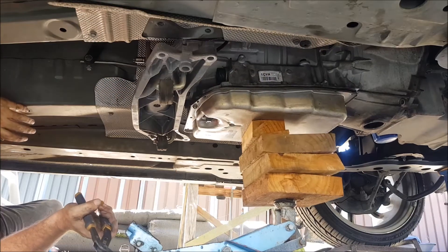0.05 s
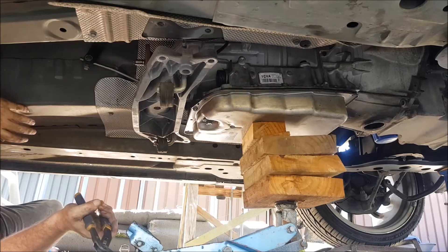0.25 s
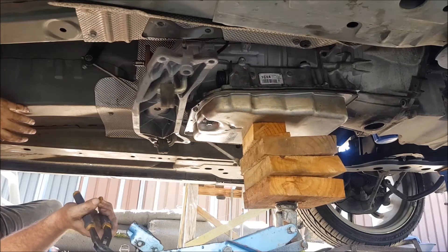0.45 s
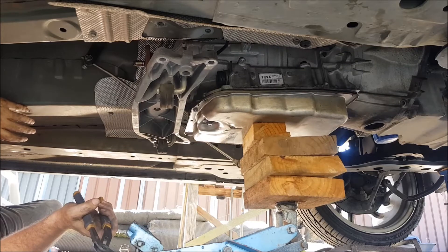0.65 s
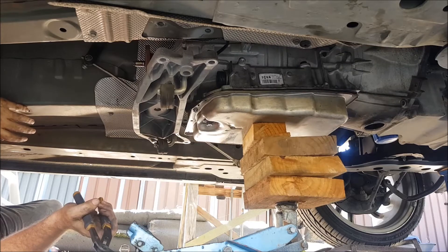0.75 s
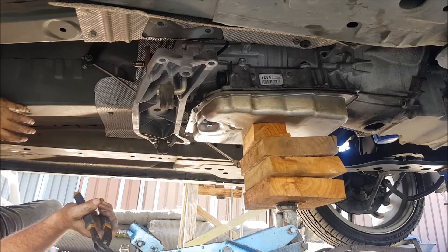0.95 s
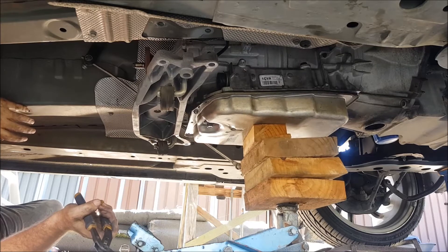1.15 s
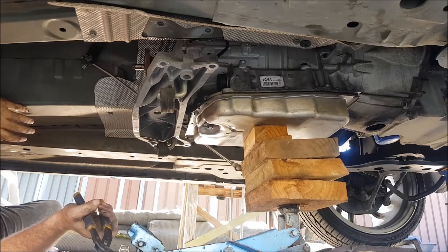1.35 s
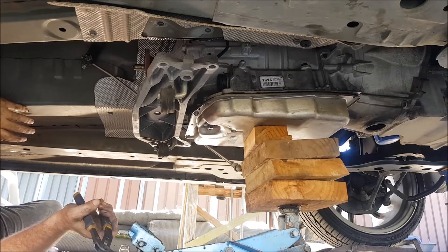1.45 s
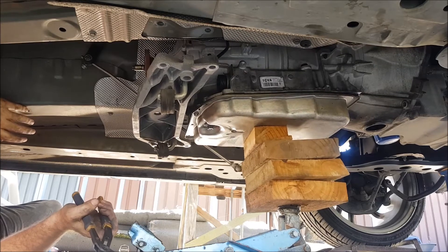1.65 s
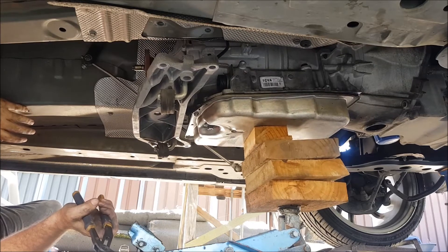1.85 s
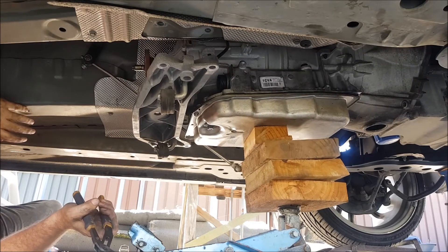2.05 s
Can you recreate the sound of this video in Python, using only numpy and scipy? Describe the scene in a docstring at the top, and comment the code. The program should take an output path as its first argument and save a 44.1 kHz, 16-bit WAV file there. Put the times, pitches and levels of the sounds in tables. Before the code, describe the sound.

A heavy gearbox drops on a trolley jack in jolting metallic clanks, with creaks and small clicks.

```python
"""In a garage, under a car: a heavy gearbox sinks on a trolley jack.
Behind it lie a low rumble and faint grainy sliding, both shaped noise.
Creaks, heard before and between the first three jolts, are uneven slips shaking a set of modes, with scraping noise.
Small parts click, noise ticks with dull knocks, mostly as the load settles after the jolts.
Five jolts each give a noise crack, a sine thump and an underbody boom; the last three ring out like steel."""
import sys
import numpy as np
from scipy import signal
from scipy.fft import irfft
from scipy.io import wavfile
from scipy.ndimage import uniform_filter1d

SR = 44100
rng = np.random.default_rng(int(sys.argv[2]) if len(sys.argv) > 2 else 0)


def inscribe(sig):
    """Save sig as 16-bit PCM at rate SR to the path in sys.argv[1].

    A 1-D sig is mono; a 2-D sig holds one channel per row.
    Samples are clipped to [-1, 1] before scaling.
    """
    pcm = np.round(np.clip(np.atleast_2d(sig).T, -1, 1) * 32767)
    wavfile.write(sys.argv[1], SR, pcm.astype(np.int16))


N = 92610  # length of the scene in samples
T = np.arange(int(.8 * SR)) / SR  # time axis of one event, s
EDGE_HZ = 15900  # upper band limit
SMALL_LEFT_DB = -24  # treble shading on the left for clicks and sliding, scaled by SHADOW

# Spectrum of surfaces scraping: (frequency [Hz], relative level per Hz [dB])
SCRAPE_SPECTRUM = [(300, -5.5), (1000, 6.5), (1700, -1), (4200, -2), (6500, -12), (9000, -15.5),
                   (12500, -8.5), (16000, -12.5)]
# Treble shading of the left ear: (frequency [Hz], share of its treble loss [ratio])
SHADOW_SHARE = [(250, 0), (600, .1), (1300, .42), (3000, .7), (6000, 1.15), (9000, 1.35), (12000, .85),
                (14500, .6)]


def amp(db):
    """Decibels to gain."""
    return 10 ** (np.asarray(db) / 20)


def evened(x):
    """Scales the louder channel to rms 1."""
    return x / np.sqrt(np.max(np.mean(x ** 2, -1)) + 1e-20)


def read(points, hz):
    """Reads a table on a log-frequency axis."""
    f, value = np.transpose(points)
    return np.interp(np.log(hz + 1), np.log(f + 1), value)


def add(mix, s, sound):
    """Mixes a stereo sound in at time s."""
    part = mix[:, max(round(s * SR), 0):][:, :sound.shape[1]]
    part += sound[:, :part.shape[1]]


def decay(t, t60):
    """Exponential decay by 60 dB in t60 seconds."""
    return np.exp(-np.log(1000) * t / t60)


def envelope(rise, hold, t60):
    """Linear attack, hold and exponential release, in seconds."""
    return np.minimum(T / rise, 1) * decay(np.maximum(T - rise - hold, 0), t60)


def noise(spectrum, left_db, tilt_db=0, colour=lambda hz: 0, size=len(T)):
    """Stereo noise of a given spectrum, tilt per octave and colour in dB, its treble shaded on the left."""
    # Likeness of the two ears: (frequency [Hz], left-right likeness [0-1])
    likeness = [(30, 0.64), (90, 1), (180, 0.82), (350, 0.73), (700, 0.61), (1500, .4), (3000, 0.68),
                (16000, 0.15)]
    hz = np.fft.rfftfreq(size, 1 / SR) + 1
    right, other = rng.standard_normal((2, len(hz))) + 1j * rng.standard_normal((2, len(hz)))
    same = np.clip(read(likeness, hz), 0, 1)
    left = same * right + np.sqrt(1 - same ** 2) * other
    left = left * amp(left_db * read(SHADOW_SHARE, hz))
    db = read(spectrum, hz) + tilt_db * np.log2(hz) + colour(hz)
    return evened(irfft(np.array([left, right]) * amp(db) * (hz < EDGE_HZ), size))


def garage(x):
    """Turns steady noise into a room tail whose decay time varies with frequency."""
    # Reverberation of the garage: (frequency [Hz], t60 [s])
    room = [(100, .4), (1000, 0.29), (2800, 0.29), (4500, 0.19), (6500, 0.13), (12000, .26), (16000, .2)]
    hz, t, bands = signal.stft(x, SR, nperseg=256)
    bands = bands * decay(t, read(room, hz)[:, None])
    return signal.istft(bands, SR)[1][:, :len(T)] * np.minimum(T / .008, 1)


def ring(modes, left_db, tilt_db=0, rough=0):
    """Decaying modes; reflections make them flutter if rough, and reach the two ears out of step."""
    flutter_hz = 70
    out, knots = np.zeros((2, len(T))), np.arange(128) / flutter_hz
    for hz, db, t60 in modes:
        shade = read(SHADOW_SHARE, hz)
        turn, skew = rng.uniform(-np.pi, np.pi, 2)
        sway = rng.standard_normal((2, len(knots))) + 1j * rng.standard_normal((2, len(knots)))
        t = T[T < 1.5 * t60]
        swaying = np.array([np.interp(t, knots, s) for s in sway])
        flutter = (1 + rough * swaying) / np.hypot(1, rough)
        ears = np.array([[amp(left_db * shade) * np.exp(1j * skew * shade)], [1]])
        wave = np.exp(1j * (2 * np.pi * hz * t + turn)) * decay(t, t60)
        gain = amp(db + tilt_db * np.log2(hz / modes[0][0]))
        out[:, :len(t)] += (ears * flutter * wave).real * gain
    return out


def rumble():
    """Low rumble of the garage: shaped noise whose level drifts."""
    # Spectrum of the rumble: (frequency [Hz], relative level per Hz [dB])
    floor = [(15, -29.5), (28, -18.5), (45, -5), (100, -2), (160, -6.5), (250, -10), (400, -14), (650, -21),
             (1040, -26.5), (1560, -39), (4500, -49), (16000, -54)]
    # Drift of the rumble: (time [s], level [dB])
    floor_db = [(0, -46.5), (.18, -47.5), (.75, -53), (1.35, -54.5), (1.65, -51), (1.85, -50), (2.1, -50.5)]
    t = np.arange(N) / SR
    return noise(floor, -1.5, size=N) * amp(np.interp(t, *np.transpose(floor_db)))


def sliding():
    """Faint grainy sliding under the load: scraping noise with a randomly wavering level."""
    # Course of the sliding, before its grain: (time [s], level [dB])
    rub_db = [(0, -73), (.07, -52.5), (.2, -72.5), (.7, -77.5), (.95, -73.5), (1.3, -67), (1.68, -62),
              (1.9, -75), (2.1, -69.5)]
    t = np.arange(N) / SR
    grain = evened(uniform_filter1d(rng.standard_normal(N), size=400))  # smoothed over 9 ms
    db = np.interp(t, *np.transpose(rub_db)) + 2.2 * grain
    return noise(SCRAPE_SPECTRUM, SMALL_LEFT_DB, size=N) * amp(db)


def click(db, bright_hz, boost_db, tilt_db, top_hz, knock_db):
    """A small part slips: a bright tick, a dull knock and the room's answer."""
    # Spectrum of a tick, before tilt and colour: (frequency [Hz], relative level per Hz [dB])
    tick_spectrum = [(300, -19.5), (1700, -5), (3000, 0.5), (5000, 2.5), (6500, -6.5), (8200, -10.5),
                     (11000, -9.5), (13000, -10.5), (16000, -15)]
    # Spectrum of the dull knock: (frequency [Hz], relative level per Hz [dB])
    knock_spectrum = [(100, -35), (400, -12), (580, 7), (900, -2), (1600, -11), (5000, -28)]
    boost_octaves, room_db = 0.29, -12.5
    snap_gain, snap_s = 0.37, 0.00084  # the direct sound stands out from its first reflections

    def colour(hz):
        """One broad resonance and a steep top edge, in dB."""
        resonance = boost_db * np.exp(-.5 * (np.log2(hz / bright_hz) / boost_octaves) ** 2)
        return resonance - 10 * np.log10(1 + (hz / top_hz) ** 10)

    tick = noise(tick_spectrum, SMALL_LEFT_DB, tilt_db, colour)
    tick *= envelope(rise=0.00033, hold=0.00069, t60=0.071)
    tick *= 1.07 + snap_gain * np.exp(-(T / snap_s) ** 2)
    tail = amp(room_db) * garage(noise(tick_spectrum, SMALL_LEFT_DB, tilt_db, colour))
    knock = noise(knock_spectrum, SMALL_LEFT_DB) * envelope(rise=0.0078, hold=0, t60=0.097)
    return amp(db) * (tick + tail) + amp(knock_db) * knock


def creak(length, groan_db, rate, tilt_db, scrape_db):
    """Stick-slip: uneven slips shake the support's modes while the surfaces scrape."""
    # Modes of the creaking support, before tilt: (frequency [Hz], relative level [dB], t60 [s])
    support = [(342.1, -6, 0.11), (392, -2.5, .12), (500.3, -3, 0.13), (654, -4.5, .11), (850, -10, .08),
               (988, 3, 0.027), (1109, -8, 0.099), (1120, 1, 0.034), (1548, -15.5, 0.11)]
    left_db, slip_jitter, slip_spread_db = -13, .3, 4
    gaps, sizes = rng.standard_normal((2, 40))
    at = np.cumsum(np.exp(slip_jitter * gaps)) / rate
    at = at - at[0]
    during = at < length
    slips = np.zeros(len(T))
    slips[(at[during] * SR).astype(int)] = amp(slip_spread_db * sizes[during])
    modes = ring(support, left_db, tilt_db)
    groan = signal.fftconvolve(slips[None], modes, axes=1)[:, :len(T)]
    dull = signal.butter(2, 2200, fs=SR, output="sos")
    groan = evened(signal.sosfilt(dull, groan)) * np.sqrt(length / T[-1])
    scrape = noise(SCRAPE_SPECTRUM, left_db) * envelope(length / 2, length * 0.4, t60=0.14)
    return amp(groan_db) * groan + amp(scrape_db) * scrape


def contact_crack(left_db, tilt_db):
    """Metal cracks against metal: a short noise burst with a snap at its start and a room tail."""
    # Spectrum of the crack, before tilt: (frequency [Hz], relative level per Hz [dB])
    crack_spectrum = [(200, -6), (700, -6), (1150, -0.5), (1750, -5), (2200, -1.5), (2500, -4.5),
                      (3000, -1.5), (3450, 6), (3900, -2), (4300, 7.5), (5200, -4), (5800, -6.5),
                      (7600, -8.5), (8300, -10), (10500, -8), (11500, -10.5), (13000, -6), (16000, -8)]
    snap_gain, snap_s, room_db = 0.23, 0.0019, -15.5
    crack = noise(crack_spectrum, left_db, tilt_db)
    crack *= envelope(rise=0.0011, hold=0.0048, t60=0.066)
    crack *= 1 + snap_gain * np.exp(-(T / snap_s) ** 2)
    return crack + amp(room_db) * garage(noise(crack_spectrum, left_db, tilt_db))


def casing_thump(start_hz):
    """The mass lands just after the contact: a brief sine that swells, fades and sags slightly."""
    delay_s, rise_s, fade_s, sag_per_s, fade_shape = .0052, .0095, .0195, .5, 2.1
    t = np.maximum(T - delay_s, 0)
    swell = np.sin(np.pi / 2 * np.minimum(t / rise_s, 1)) ** 2
    fade = np.exp(-(np.maximum(t - rise_s, 0) / fade_s) ** fade_shape)
    hz = start_hz * np.exp(-sag_per_s * t)
    return swell * fade * np.sin(2 * np.pi * np.cumsum(hz) / SR)


def underbody_boom(left_db):
    """Casing and underbody boom on: low noise and decaying modes, faded together."""
    # Spectrum of the boom: (frequency [Hz], relative level per Hz [dB])
    boom_spectrum = [(25, -29.5), (60, -7), (115, -18), (180, 6.5), (300, -1.5), (500, -5), (800, -16),
                     (1100, -21), (1500, -20.5), (3000, -30), (8000, -64)]
    # Casing and underbody modes: (frequency [Hz], relative level [dB], t60 before the fade [s])
    case_modes = [(180.2, 7, .33), (217.7, -2, .3), (260.8, -7, 0.45), (277.6, -2.5, 0.32),
                  (334.4, 0.5, 0.31), (385.7, -2.5, 0.18), (431.9, -9, 0.82), (480.4, -6, 0.24),
                  (508, -8.5, 0.22), (663.6, -9, 0.2), (970, -12, 0.1), (1065, -11, 0.051),
                  (1170, -28, 0.22)]
    rise_s, case_db, length_s = .014, -1, 0.12
    boom = amp(1.5) * noise(boom_spectrum, left_db) * envelope(rise_s, hold=0, t60=0.34)
    boom += amp(case_db) * ring(case_modes, left_db) * np.minimum(T / rise_s, 1)
    return boom * np.exp(-(T / length_s) ** 4)


def overtones(count=70):
    """A crowd of weak, short steel modes spread over the treble."""
    first_db, tilt_db, spread_db = -13, -.5, 4  # tilt per octave
    hz = np.linspace(2900, 15500, count) * rng.uniform(.98, 1.02, count)
    db = first_db + tilt_db * np.log2(hz / hz[0]) + spread_db * rng.uniform(-2, 1, count)
    t60 = .17 * np.sqrt(6000 / hz)  # higher modes die sooner
    return list(zip(hz, db, t60))


def steel_ring(steel_modes, left_db):
    """Struck steel rings on in fluttering modes."""
    return ring(steel_modes, left_db, rough=.75) * np.minimum(T / 0.0018, 1)


def jolt(steel_modes, crack_db, tilt_db, top_hz, thump_db, thump_hz, boom_db, steel_db, left_db):
    """Metal cracks against metal, the mass lands just after, and casing and steel ring on."""
    crack = contact_crack(left_db, tilt_db)
    thump = casing_thump(thump_hz)
    boom = underbody_boom(left_db)
    steel = steel_ring(steel_modes, left_db)
    contact = signal.butter(2, min(top_hz, EDGE_HZ), fs=SR, output="sos")  # softer contacts are duller
    clank = signal.sosfilt(contact, amp(crack_db) * crack + amp(steel_db) * steel)
    return clank + amp(thump_db) * thump + amp(boom_db) * boom


def scene():
    """Clicks, creaks and jolts over the background."""
    # Small parts slipping: (time [s], level [dB], brightest frequency [Hz], its boost [dB],
    # tilt [dB per octave], top frequency [Hz], low knock level [dB])
    clicks = [(0.0136, -50, 3000, 13, 8, 14900, -81), (0.1340, -39, 3300, 6, -4, 15000, -39.5),
              (0.19, -52, 12200, 8, -2.5, 15000, -74), (0.7645, -48.5, 10500, 2.5, 9, 13800, -60),
              (0.7894, -56.5, 4080, 8, -3, 12890, -72), (1.0114, -60.5, 3770, 6, -4.5, 6070, -57),
              (1.0306, -52.5, 4104, 10, -5.5, 5920, -74), (1.1892, -62, 4470, 1, 5.5, 14050, -80),
              (1.2326, -63, 2860, -6, 2.5, 13830, -90), (1.3076, -55.5, 3030, 5.5, 2.5, 11000, -90),
              (1.3790, -62.5, 3300, -1, 0, 8000, -80), (1.4271, -38.5, 3550, 10, -2.5, 13850, -45.5),
              (1.4956, -38.5, 8900, 3.5, 8.5, 10200, -70), (1.5630, -43.5, 5100, -0.5, 4.5, 15000, -56.5),
              (1.636, -44.5, 3850, 2, -2, 14000, -50.5), (1.6560, -51.5, 1903, 8, -4.5, 3190, -54.5),
              (1.676, -52.5, 1890, 1, -5.5, 3000, -53.5), (1.726, -63, 3690, 12, -4, 8000, -53.5)]
    # Stick-slip creaks: (time [s], length [s], groan level before length scaling [dB],
    # nominal slip rate [per s], groan tilt [dB per octave], scrape level [dB])
    creaks = [(0.045, 0.029, -44.5, 397, -12, -80), (0.216, 0.029, -30.5, 247, 3.5, -44),
              (0.252, 0.033, -31.5, 200, 9.5, -34.5), (0.358, 0.021, -20.5, 330, -2.5, -34)]
    # Drops of the gearbox: (time [s], crack level [dB], crack tilt [dB per octave],
    # top frequency of the contact [Hz], thump level [dB], thump starting frequency [Hz],
    # boom level [dB], steel ring level [dB], left ear's treble before SHADOW_SHARE [dB])
    jolts = [(0.2112, -23.5, 1, 14700, -.5, 202.4, -18, -42, -12),
             (0.3375, -21, 4.5, 15000, -23.5, 250, -22.5, -44.5, -21),
             (0.4312, -14, -0.5, 15100, -11.5, 194.5, -21, -15, -13.5),
             (0.5212, -24, -1, 9000, -20.5, 191.2, -29, -27, -17),
             (0.5960, -27.5, 0.5, 4560, -26.5, 190.6, -35, -34, -15)]
    # Main steel modes: (frequency [Hz], relative level [dB], t60 [s])
    main_steel = [(1484, -24, .64), (2061, -19, .35), (2130, -10, .13), (2675, -18, .42), (2822, -19, .38),
                  (3400, -3, .085), (3497, -3, .12), (3667, -14, .35), (4200, -7, .31), (4423, -5.5, .31),
                  (4983, -2, .23), (5210, -7, .17), (5374, -7, .16), (6066, -17, .25), (6535, -18, .17),
                  (6968, -14, .27), (7041, -16, .25), (7830, -6, .165)]
    mix = rumble() + sliding()
    steel_modes = main_steel + overtones()
    for s, *row in clicks:
        add(mix, s, click(*row))
    for s, *row in creaks:
        add(mix, s, creak(*row))
    for s, *row in jolts:
        add(mix, s, jolt(steel_modes, *row))
    return mix


def record(dry):
    """Full-scale clipping, then the band limit."""
    band = signal.firwin(511, EDGE_HZ, window=("kaiser", 9), fs=SR)
    return signal.oaconvolve(np.clip(dry, -1, 1), band[None], "same")


dry = scene()
out = record(dry)
inscribe(out)
```